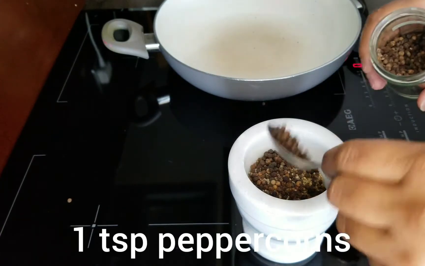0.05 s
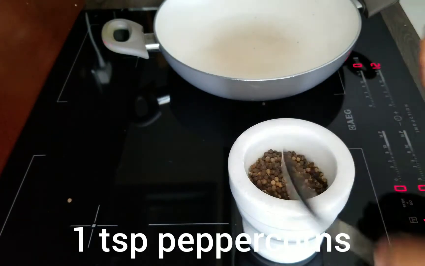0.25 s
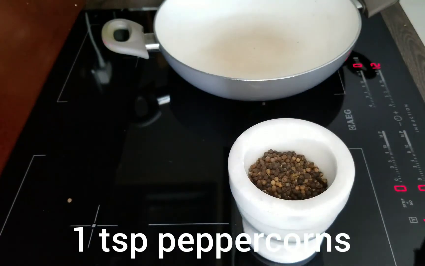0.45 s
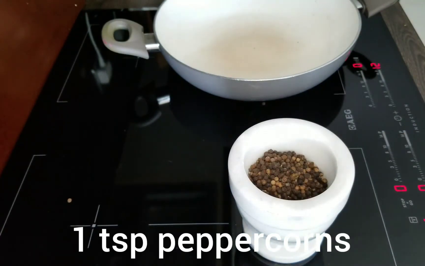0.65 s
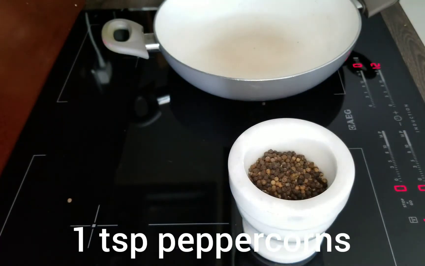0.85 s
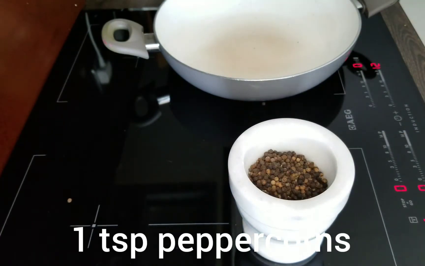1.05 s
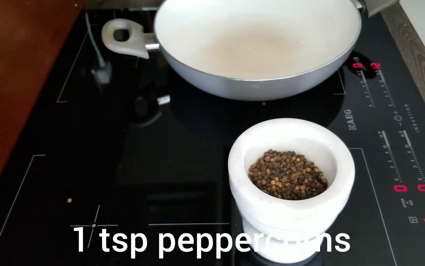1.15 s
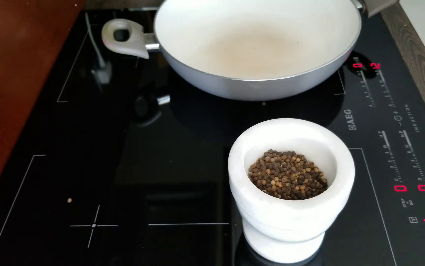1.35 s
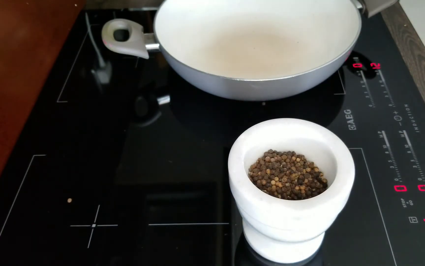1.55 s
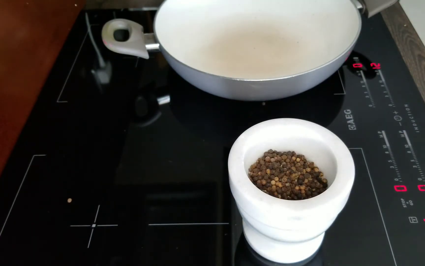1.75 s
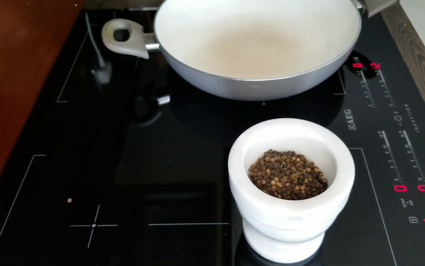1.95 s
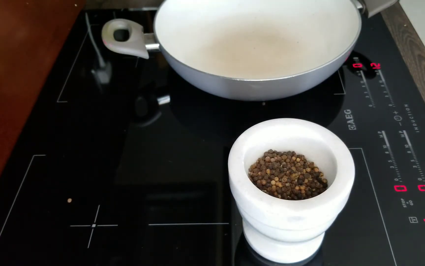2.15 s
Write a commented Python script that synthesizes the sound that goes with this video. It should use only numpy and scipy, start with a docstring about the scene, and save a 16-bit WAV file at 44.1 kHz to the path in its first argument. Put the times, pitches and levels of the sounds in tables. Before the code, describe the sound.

Close stereo pickup in a small, fairly dry kitchen: spoon clinks, a quick bright metallic rattle that stops abruptly, a tin knocking and scraping briefly, a quiet pause, then firm dull thumps, with a soft appliance hum underneath.

```python
"""A small kitchen: spices are measured out over the low hum of an appliance.
A steel spoon clinks on a mortar, then is dropped and rattles to rest, ringing high among chattering grains.
A small tin is set down and slid a little, its lid is twisted; dull thumps sound on the worktop.
Struck bodies are noise cracks plus decaying sines; slide and chatter are coloured random contacts,
the lid is swelling noise, the appliance is a wavering hum over rumble and hiss."""
import sys
import numpy as np
from scipy import signal
from scipy.fft import rfft, irfft
from scipy.io import wavfile

SR = 44100
rng = np.random.default_rng(int(sys.argv[2]) if len(sys.argv) > 2 else 0)


def int16_out(signal):
    """Quantize to a 16-bit WAV file."""
    q = np.round(np.clip(np.atleast_2d(signal).T, -1, 1) * 32767)
    wavfile.write(sys.argv[1], SR, q.astype(np.int16))


N = 97020
TIME = np.arange(N) / SR
RING_S = 0.6  # length of each hit and of the kitchen's echo
CUTOFF_HZ = 16000

# appliance hum partials: multiple, level_db
HUM_PARTIALS = [(1, -2.5), (2, -22.5), (3, -23.5)]
# level curve shared by hum and rumble: time_s, level_db
HUM_LEVEL = [(0, -46), (.44, -45.5), (.55, -51), (1.25, -53), (1.55, -47.5), (2.2, -45)]
# rumble colour: frequency_hz, relative_level_db_per_hz
RUMBLE_COLOUR = [(25, -10.5), (60, 2.5), (110, 6.5), (400, -17.5), (1000, -36.5)]
# hiss colour: frequency_hz, relative_level_db_per_hz
HISS_COLOUR = [(300, 5.5), (1000, -9.5), (2000, -16.5), (2300, -4), (2700, -14.5), (15500, -14.5)]
HUM_HZ, HUM_WAVER_HZ = 133.6, 0.97
RUMBLE_DB = -11.5  # relative to the shared level curve
HISS_DB = -71

# left-right likeness of diffuse sound: frequency_hz, likeness (-1 to 1)
LIKENESS = [(350, 0.78), (700, 0.22), (3000, 0.022)]
# kitchen echo decay: frequency_hz, t60_s
ROOM_T60 = [(200, 0.41), (4000, 0.2129), (12000, 0.0671)]
# kitchen echo colour: frequency_hz, relative_level_db
ROOM_COLOUR = [(150, -6), (1000, 0.5)]

# thumps on the worktop: start_s, level_db, brightness_db_per_octave, favoured_hz
THUMPS = [(1.111, -44, 1.5, 298), (1.8835, -19, 1, 422), (1.891, -26.5, -2.5, 510),
          (1.931, -37.5, 0.5, 300), (1.953, -36.5, -0.5, 410), (2.126, -29.5, -2, 1900),
          (2.138, -30, -0.5, 278)]
# worktop resonances: pitch_hz, level_db, t60_s, left_right_db
WORKTOP_MODES = [(164.3, -3, 0.14, 1), (311.1, 0.5, 0.067, 0.5), (448.5, -5.5, 0.041, 1.5),
                 (532.4, -9, 0.055, 13.5), (647, -13.5, 0.12, 12.5), (1160, -20, 0.19, -6.5)]
# colour of the worktop's crack: frequency_hz, relative_level_db_per_hz
WORKTOP_CRACK = [(60, -37), (220, -6), (480, 1.5), (1600, -15), (1950, -12.5), (2800, -26.5), (7000, -35),
                 (15000, -45)]

# faint rubs of the twisted lid: middle_s, length_s, level_db
TWISTS = [(1.48, 0.12, -63), (1.739, 0.031, -63)]
# colour of the rub: frequency_hz, relative_level_db_per_hz
TWIST_COLOUR = [(3000, -23), (3650, 3), (4600, -13), (7400, -8), (8900, 4.5), (10500, -13), (15500, -3)]

# the tin's rim touches the worktop: start_s, level_db, brightness_db_per_octave, favoured_hz
RIM_TAPS = [(.8815, -28.5, 1, 2018), (.890, -31, 0, 1099), (.907, -32.5, 0.76, 1104)]
# rim resonances: pitch_hz, level_db, t60_s, left_right_db
RIM_MODES = [(567, -8, 0.29, 1), (1180, -3.5, 0.043, 3), (1928, -5.5, 0.074, -1.5)]
# the tin's base lands flat: start_s, level_db, brightness_db_per_octave, favoured_hz
TIN_KNOCKS = [(.9293, -28, 0, 520), (.9487, -28, 0.5, 380), (.956, -37, -1, 1180)]
# base resonances: pitch_hz, level_db, t60_s, left_right_db
TIN_MODES = [(381, -8.5, 0.05, -5), (521, -8, 0.045, 10.5), (1202, -1, 0.039, -1.5),
             (3616, -10.5, 0.065, -5.5), (4980, 1.5, 0.011, 21.5)]
# colour of the tin's crack: frequency_hz, relative_level_db_per_hz
TIN_CRACK = [(150, -34), (400, 4), (1200, 0), (1550, -9.5), (3500, -5.5), (12000, -15)]
# loudness of the tin's slide: time_s, level_db
SLIDE_LEVEL = [(.955, -79.5), (.975, -51), (1.01, -49.5), (1.05, -67), (1.075, -48), (1.095, -42.5),
               (1.118, -35.5), (1.135, -60), (1.25, -91)]
# colour of the slide: frequency_hz, relative_level_db_per_hz
SLIDE_COLOUR = [(150, -23.5), (400, 3.5), (700, -8), (1050, 7.5), (1600, -16.5), (4000, -11), (9000, -25)]
SLIDE_GRIPS_PER_S = 7400
# the rim's ring starts sharp by this share and sags as more of the rim bears down
RIM_BEND, SETTLE_S = 0.083, 0.011

# the spoon clinks on the mortar: start_s, level_db, brightness_db_per_octave, favoured_hz
CLINKS = [(.2392, -22, 0, 11580), (.2475, -19.5, -1, 14500), (.258, -29, 1.5, 4010),
          (.3435, -38, -3.5, 9500)]
# clink resonances: pitch_hz, level_db, t60_s, left_right_db
CLINK_MODES = [(1556, -14, 0.025, 0.5), (3975, -11, 0.055, -6), (5400, -11, .08, 2), (6780, -13, 0.05, 9),
               (10030, -13.5, .11, 0), (11370, -9, 0.11, 12.5), (12700, -13, 0.073, 10.5),
               (14900, -16, .11, 9)]
# colour of the clink's crack: frequency_hz, relative_level_db_per_hz
CLINK_CRACK = [(200, -27), (1400, -1), (2700, -14.5), (3700, 2), (6100, -12), (7100, 0.5), (8600, -10.5),
               (12000, -4), (15500, -7)]

# the dropped spoon rattles: start_s, level_db, brightness_db_per_octave, favoured_hz
RATTLE = [(.4304, -19, -3, 7060), (.4705, -13.5, 2, 5728), (.4947, -12, 1, 11143), (.5165, -13.5, 3, 11143),
          (.525, -19, -4, 5728), (.5465, -14, 4.5, 12230), (.555, -18, -2.5, 5728), (.570, -15, 10, 11143),
          (.588, -24.5, -2, 8820), (.598, -17, 5, 12230), (.642, -22, -2.5, 8820), (.652, -24.5, -4, 11143)]
# pitches of the spoon's resonances: pitch_hz
SPOON_HZ = [3899, 5383, 5728, 6942, 7062, 8820, 9437, 11143, 12212, 12252, 15400]
# how each of those pitches rings: level_db, t60_s, left_right_db
SPOON_RING = [(-16, 0.18, -5), (-17.5, .45, 0.5), (-14, 0.26, 2), (-20.5, .25, 5.5), (-12.5, 0.69, 5.5),
              (-8.5, 0.41, 8.5), (-18.5, 0.23, -4.5), (-8.5, .18, 12), (-13.5, 0.068, 10.5),
              (-16, 0.26, 14.5), (-18, 0.23, 11)]
# colour of the spoon's crack: frequency_hz, relative_level_db_per_hz
SPOON_CRACK = [(200, -28), (2000, -5.5), (4500, -12.5), (6500, 8.5), (10300, -9), (12000, 3),
               (14000, -20.5), (15500, -2)]
# its handle knocks in between: start_s, level_db, brightness_db_per_octave, favoured_hz
HANDLE_KNOCKS = [(.453, -21.5, 2, 1576), (.4875, -20, -1, 2510), (.6705, -29.5, -1, 1143)]
# handle resonances: pitch_hz, level_db, t60_s, left_right_db
HANDLE_MODES = [(1212, -10, .08, 1.7), (1617, -7, 0.083, 3.6)]
# colour of the handle's crack, also used for the grains: frequency_hz, relative_level_db_per_hz
HANDLE_CRACK = [(250, -19.5), (1000, -4), (2500, -2), (15000, -16)]
# loudness of the loose grains chattering: time_s, level_db
CHATTER_LEVEL = [(.39, -80.5), (.425, -47), (.44, -36.5), (.53, -33.5), (.58, -40.5), (.66, -45.5),
                 (.76, -83)]
CHATTER_PER_S = 2200
SPOON_FLUTTER_DB, FLUTTER_PER_S = 3, 90  # the rocking spoon rings unevenly
REST_S, REST_DAMPING_DB_PER_S = 0.61, 149  # its support damps the ring from here on

FOCUS_DB = 8  # lift where the place of contact favours the spectrum
SNAP_T60 = 0.012  # seconds, the brief start of a hard contact


def amp(db):
    """Decibels to gain."""
    return 10 ** (np.asarray(db) / 20)


def rms_one(x):
    """Scale to an rms of 1."""
    return x / np.sqrt(np.mean(x ** 2) + 1e-20)


def at_hz(points, hz):
    """Read a table on a log-frequency axis."""
    f, value = np.transpose(points)
    return np.interp(np.log(np.maximum(hz, 1)), np.log(f), value)


def in_time(points):
    """Read a curve at every sample."""
    return np.interp(TIME, *np.transpose(points))


def dying(t, t60):
    """Exponential decay, 60 dB down after t60."""
    return np.exp(-np.log(1000) * t / t60)


def panned(db):
    """Left and right gains for a level difference."""
    return amp(np.array([[0.5], [-0.5]]) * db)


def coloured(x, spectrum):
    """Give a stereo noise a spectrum and the likeness of diffuse sound; rms 1."""
    size = x.shape[-1]
    hz = np.arange(size // 2 + 1) * SR / size
    low_fade = np.minimum(hz / spectrum[0][0], 1) ** 2
    mid, side = rfft(x) * amp(at_hz(spectrum, hz)) * low_fade
    alike = np.clip(at_hz(LIKENESS, hz), -0.99, 0.99)
    left_right = np.sqrt(1 + alike) * mid + np.sqrt(1 - alike) * side * [[1], [-1]]
    return rms_one(irfft(left_right, size))


def noise(spectrum, size):
    """Stereo noise with a given spectrum."""
    return coloured(rng.standard_normal((2, size)), spectrum)


def grains(per_s):
    """Tiny random contacts of uneven strength."""
    return (rng.random(N) < per_s / SR) * rng.standard_normal((2, N))


def struck(hits, modes, crack, crack_db, crack_t60, pan_db, pivot_hz, choke_db, attack_s,
           focus_octaves, snap=0, bend=0, flutter_db=0):
    """Each contact cracks and excites the body's modes, coloured by where it lands; later contacts choke it.
    A settling body starts sharp by the share bend; on a rocking one each mode flutters on its own."""
    size = int(RING_S * SR)
    t = np.arange(size) / SR
    out = np.zeros((2, N + size))
    mode_likeness = [at_hz(LIKENESS, mode[0]) for mode in modes]
    phase_lags = np.arccos(np.clip(mode_likeness, -1, 1)) / 2
    grid = np.geomspace(crack[0][0], SR / 2, num=200)
    flutter_points = len(hits) * 20
    for s, db, tilt, focus_hz in hits:
        def colour_db(hz):
            """Brightness tilt plus the lift around the favoured frequency."""
            focus = np.exp(-(np.log2(hz / focus_hz) / focus_octaves) ** 2)
            return tilt * np.log2(hz / pivot_hz) + FOCUS_DB * focus

        burst = noise(np.column_stack([grid, at_hz(crack, grid) + colour_db(grid)]), size)
        crack_decay = dying(t, crack_t60) + snap * dying(t, SNAP_T60)
        hit = amp(crack_db) * panned(pan_db) * burst * crack_decay

        later_contacts = sum((later > s) * np.clip((s + t - later) / attack_s, 0, 1) for later, *_ in hits)
        choked = amp(-choke_db * later_contacts)
        # the pitch sags over time counted from the first contact
        bent_time = t - bend * SETTLE_S * np.exp(-(s + t - hits[0][0]) / SETTLE_S)

        for (hz, level, t60, pan), lag in zip(modes, phase_lags):
            rocking = np.interp(t * FLUTTER_PER_S, np.arange(flutter_points),
                                rng.standard_normal(flutter_points))
            # the middle random term makes every contact excite the mode a little differently
            strength = amp(level + colour_db(hz) + rng.standard_normal() + flutter_db * rocking)
            phase = 2 * np.pi * (hz * bent_time + rng.random()) - lag * np.array([[1], [-1]])
            hit += strength * panned(pan) * np.sin(phase) * dying(t, t60) * choked

        start = int(s * SR)
        attack = 1 - np.exp(-(t / attack_s) ** 2)
        out[:, start:start + size] += amp(db) * hit * attack
    return out[:, :N]


def appliance():
    """A slightly wavering harmonic hum over rumble and faint hiss."""
    waver = np.interp(TIME, np.linspace(0, TIME[-1], num=24), rng.standard_normal(size=24))
    phase = 2 * np.pi * np.cumsum(HUM_HZ + HUM_WAVER_HZ * waver) / SR
    hum = sum(np.sqrt(2) * amp(db) * np.sin(round(k) * phase) for k, db in HUM_PARTIALS)
    rumble = amp(RUMBLE_DB) * noise(RUMBLE_COLOUR, N)
    hiss = amp(HISS_DB) * noise(HISS_COLOUR, N)
    return amp(in_time(HUM_LEVEL)) * (panned(1.5) * hum + rumble) + hiss


def kitchen(x, build_s=0.002):
    """Dense reflections build up quickly and die away at a different rate in each octave."""
    size = int(RING_S * SR)
    t = np.arange(size) / SR
    echo_noise = noise(ROOM_COLOUR, size)
    edges = np.geomspace(70, 17000, 9)
    tail = 0
    for low, high in zip(edges, edges[1:]):
        band_pass = signal.butter(2, [low, high], "band", fs=SR, output="sos")
        band = signal.sosfilt(band_pass, echo_noise)
        tail = tail + band * dying(t, at_hz(ROOM_T60, np.sqrt(low * high)))
    tail = rms_one(tail * (1 - np.exp(-t / build_s))) / np.sqrt(size)
    return signal.fftconvolve(x, tail, axes=1)[:, :N]


def in_room(x, wet_db):
    """Direct sound plus the kitchen's echo."""
    return x + amp(wet_db) * kitchen(x)


def worktop(low_cut_hz=140):
    """Heavier things are put down with a dull thump; the worktop radiates no deep bass."""
    # a soft, broad contact favours a wide band
    thumps = struck(THUMPS, WORKTOP_MODES, WORKTOP_CRACK, crack_db=-4, crack_t60=0.1, pan_db=1.5,
                    pivot_hz=410, choke_db=0, attack_s=0.00037, focus_octaves=0.35)
    low_cut = signal.butter(2, low_cut_hz, "high", fs=SR, output="sos")
    return in_room(signal.sosfilt(low_cut, thumps), wet_db=-14.5)


def lid():
    """Each twist of the lid is a rub of noise that swells and fades."""
    swells = sum(amp(db) * np.exp(-((TIME - s) / length) ** 2) for s, length, db in TWISTS)
    return swells * noise(TWIST_COLOUR, N)


def tin():
    """The tin touches down on its rim, its ring sagging as it settles, lands on its base, then slides in tiny grips."""
    contact = dict(crack=TIN_CRACK, crack_db=2.5, crack_t60=0.04, pan_db=1, pivot_hz=1220,
                   choke_db=13, attack_s=0.0014, focus_octaves=0.093)
    rim = struck(RIM_TAPS, RIM_MODES, bend=RIM_BEND, **contact)
    base = struck(TIN_KNOCKS, TIN_MODES, **contact)
    grips = coloured(grains(SLIDE_GRIPS_PER_S), SLIDE_COLOUR)
    slide = amp(in_time(SLIDE_LEVEL)) * panned(-1.5) * grips
    return in_room(rim + base + slide, wet_db=-18.5)


def spoon_clink():
    """The spoon's bowl touches the mortar, damped by the hand."""
    clinks = struck(CLINKS, CLINK_MODES, CLINK_CRACK, crack_db=-2.5, crack_t60=0.1, pan_db=3.5,
                    pivot_hz=7000, choke_db=6, attack_s=0.0008, focus_octaves=0.069)
    return in_room(clinks, wet_db=-13.5)


def spoon_rattle():
    """The loose spoon bounces and rings as it comes to rest; its handle knocks and grains chatter in between."""
    modes = [(hz, *ring) for hz, ring in zip(SPOON_HZ, SPOON_RING)]
    bowl = struck(RATTLE, modes, SPOON_CRACK, crack_db=-8, crack_t60=0.091, pan_db=1,
                  pivot_hz=9300, choke_db=4.5, attack_s=0.00044, focus_octaves=0.048,
                  snap=1.8, flutter_db=SPOON_FLUTTER_DB)
    handle = struck(HANDLE_KNOCKS, HANDLE_MODES, HANDLE_CRACK, crack_db=5, crack_t60=0.04, pan_db=-2.5,
                    pivot_hz=1600, choke_db=0.5, attack_s=0.0024, focus_octaves=0.11)
    resting = amp(-REST_DAMPING_DB_PER_S * np.maximum(TIME - REST_S, 0))
    loose_grains = coloured(grains(CHATTER_PER_S), HANDLE_CRACK)
    chatter = amp(in_time(CHATTER_LEVEL)) * panned(9) * loose_grains
    return in_room(bowl * resting + handle + chatter, wet_db=-13.5)


def scene():
    """Everything that sounds in the kitchen."""
    return appliance() + worktop() + lid() + tin() + spoon_clink() + spoon_rattle()


def record(dry):
    """Peaks are rounded and the top is cut."""
    # 70 dB down from just above the cutoff
    top_cut = signal.cheby2(16, 70, CUTOFF_HZ + 600, fs=SR, output="sos")
    return signal.sosfilt(top_cut, np.tanh(dry))


dry = scene()
out = record(dry)
int16_out(out)
```